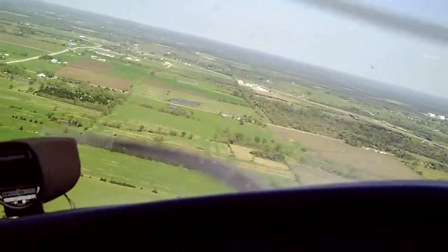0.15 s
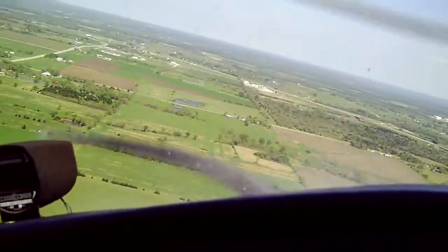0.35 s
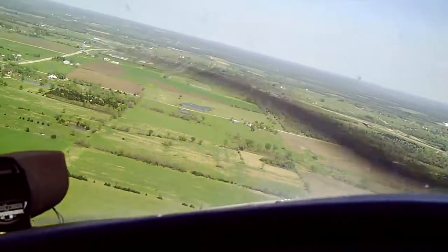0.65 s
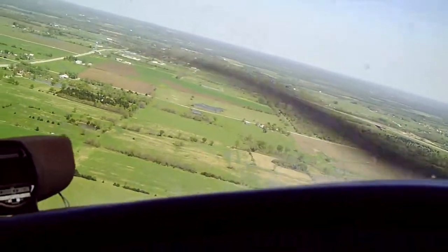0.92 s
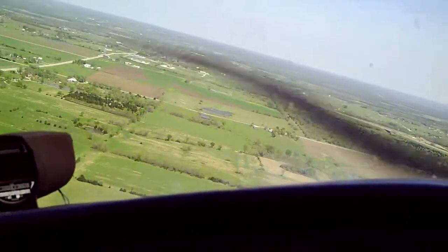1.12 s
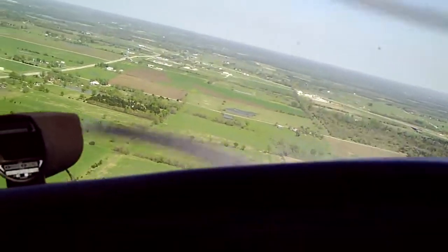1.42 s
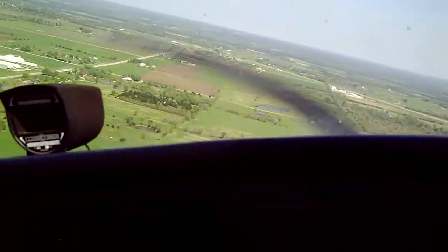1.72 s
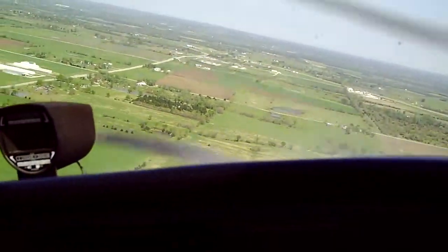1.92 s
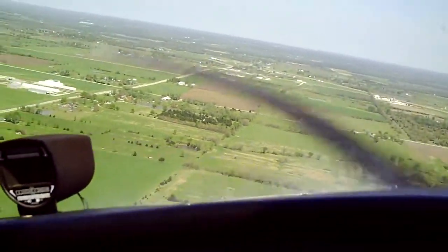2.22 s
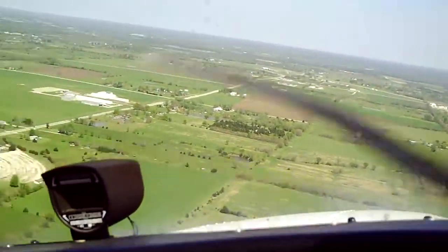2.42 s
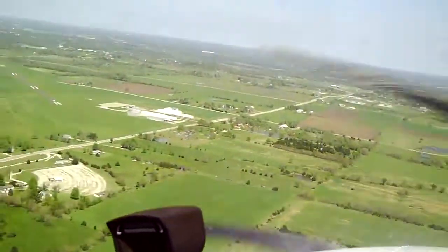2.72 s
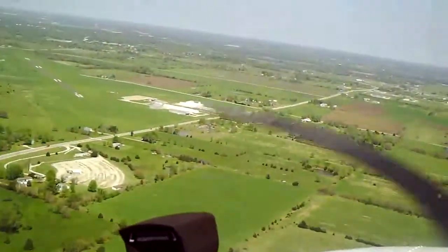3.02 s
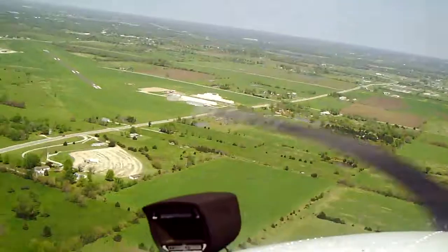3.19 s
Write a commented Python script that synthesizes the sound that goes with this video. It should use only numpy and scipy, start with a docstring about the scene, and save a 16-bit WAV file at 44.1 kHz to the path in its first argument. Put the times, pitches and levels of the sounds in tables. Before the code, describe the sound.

The loud, low drone of a light propeller aircraft in flight fills the cabin, mixed with rushing wind and deep buffeting. Its pitch sags a little toward the end, and the strongest swells slightly overload the microphone inside.

```python
"""Light propeller plane cabin, banking turn

Shaft, blade and firing tones drone and sag a little near the end, and the gears whine with them.
Exhaust pulses ring the cabin, its air throbs at a very low pitch and gusts buffet the airframe.
The slipstream roars, rushes at the seals and hisses at the vents. The loudest swings overload the mic."""
import sys
import numpy as np
from scipy import signal
from scipy.fft import rfft, irfft, next_fast_len
from scipy.io import wavfile
from scipy.ndimage import uniform_filter1d

SR = 44100
rng = np.random.default_rng(int(sys.argv[2]) if len(sys.argv) > 2 else 0)


def master_out(mix):
    """Clip the mix to full scale and print it as 16-bit PCM to the path in sys.argv[1]."""
    frames = np.transpose(np.atleast_2d(mix))
    ceiling = np.clip(frames, -1, 1)
    pcm = np.round(ceiling * 32767).astype(np.int16)
    wavfile.write(sys.argv[1], SR, pcm)


N = 147735


def undb(db):
    """Decibels to gain."""
    return 10 ** (np.asarray(db) / 20)


def unit(x):
    """Scale to rms 1."""
    return x / np.sqrt(np.mean(x ** 2))


def curve(rows):
    """Each column of a time table, joined by straight lines."""
    times, *columns = np.array(rows, float).T
    return np.squeeze([np.interp(np.arange(N) / SR, times, column) for column in columns])


def equalise(x, outline):
    """Filter by a (Hz, dB) outline."""
    hz, db = np.array(outline, float).T
    size = next_fast_len(N + SR // 10)
    bins_hz = np.maximum(np.fft.rfftfreq(size, 1 / SR), 1)
    gain = undb(np.interp(np.log(bins_hz), np.log(hz), db))
    return irfft(rfft(x, size) * gain, size)[..., :N]


def noise(spectrum):
    """Noise of rms 1 with a (Hz, dB) spectrum."""
    return unit(equalise(rng.standard_normal(N), spectrum))


def wander(rate_hz):
    """Smooth random motion of rms 1."""
    hold = max(int(SR / rate_hz), 2)
    steps = np.repeat(rng.standard_normal(N // hold + 2), hold)
    return unit(uniform_filter1d(uniform_filter1d(steps, hold), hold)[:N])


def tone(cycles):
    """Sine of rms 1 with a random starting phase."""
    return np.sqrt(2) * np.sin(2 * np.pi * (cycles + rng.random()))


# Each row: time in seconds, then level in dB of shaft multiples 1 to 5.
HARMONIC_LEVELS_DB = [(0, -14.5, -15, -21.5, -30, -25.5), (.3, -24, -21.5, -17.5, -30, -26),
                      (.65, -9, -16, -22.5, -25, -24.5), (1, -14, -15, -19.5, -24, -23.5),
                      (1.25, -15, -19, -26, -22.5, -31), (1.55, -19, -13.5, -19, -18.5, -42),
                      (1.95, -19, -15, -21, -23.5, -33), (2.2, -18, -17, -21.5, -21.5, -26.5),
                      (2.5, -10.5, -14.5, -19.5, -41, -28), (2.85, -18.5, -19, -18.5, -37, -27.5),
                      (3.1, -19, -15, -22.5, -31, -28.5), (3.35, -18, -16, -23.5, -29, -32)]
# Each row: shaft multiple, relative level in dB.
WEAK_TONES_DB = [(2.5, -29), (4.5, -32), (7, -36), (7.5, -36), (8, -34), (10, -42), (12, -38), (13, -39)]


def drone(turns, weak_gain_db=-2.5, waver_db=2, waver_hz=3.99):
    """Shaft-locked tones: five swell and fade, weaker ones waver. Multiple 2 is blades and firing."""
    strong = sum(undb(db) * tone(multiple * turns)
                 for multiple, db in enumerate(curve(HARMONIC_LEVELS_DB), start=1))
    weak = sum(undb(db + weak_gain_db + waver_db * wander(waver_hz)) * tone(multiple * turns)
               for multiple, db in WEAK_TONES_DB)
    return strong + weak


# Each row: frequency in Hz, cabin gain in dB.
EXHAUST_SPECTRUM = [(150, -12), (300, -3), (450, -2.5), (600, 1), (1000, -2.5), (1450, -1.5), (1900, -17.5),
                    (3000, -17), (4500, -56)]


def exhaust(turns, cylinders=4, level_db=-29, ring_s=.02, scatter_db=2.5, jitter_s=.00007):
    """The cylinders fire in turn over two revolutions; each rings the cabin in its own way."""
    firings = np.flatnonzero(np.diff(np.floor(2 * turns)))
    timing, strength = rng.standard_normal((len(firings), 2)).T
    starts = np.clip(firings + jitter_s * SR * timing, 0, N - 1).astype(int)
    gains = undb(scatter_db * strength)
    decay = np.exp(-np.arange(SR // 10) / SR / ring_s)
    clatter = np.zeros(N)
    for cylinder in range(cylinders):
        pulses = np.bincount(starts[cylinder::cylinders], gains[cylinder::cylinders], N)
        ring = decay * rng.standard_normal(len(decay))
        clatter += signal.fftconvolve(pulses, ring)[:N]
    return undb(level_db) * unit(equalise(clatter, EXHAUST_SPECTRUM))


# Each row: shaft multiple, width in Hz.
GEAR_TONES = [(48, 25), (62.6, 50), (72, 40)]
# Each row: time in seconds, then level in dB of each of the three gear tones.
GEAR_LEVELS_DB = [(0, -53, -50, -49), (.5, -60, -47, -56), (1.1, -51, -47, -52), (1.35, -52, -42.5, -50),
                  (1.68, -45, -42, -42.5), (1.95, -64, -48, -49), (2.45, -51, -53, -44.5),
                  (2.9, -51, -61, -51), (3.35, -53, -52, -45)]


def gear_whine(turns):
    """Narrow, rough gear tones that follow the shaft."""
    whine = np.zeros(N)
    for (multiple, width_hz), db in zip(GEAR_TONES, curve(GEAR_LEVELS_DB)):
        detune_hz = width_hz / 2 * wander(2 * width_hz)
        whine += undb(db) * tone(multiple * turns + np.cumsum(detune_hz) / SR)
    return whine


# Each row: time in seconds, level in dB.
THROB_LEVEL_DB = [(0, -28), (.18, -10.5), (.32, -20), (.55, -14), (.8, -16.5), (1, -20), (1.35, -16.5),
                  (1.48, -7.5), (1.68, -17.5), (1.88, -14), (2.25, -16.5), (2.48, -10.5), (2.65, -15),
                  (2.87, -10), (3.15, -11), (3.35, -19)]


def cabin_throb(centre_hz=23, drift_hz=3):
    """The cabin air pumps at an unsteady, very low pitch."""
    pitch_hz = centre_hz + drift_hz * wander(rate_hz=8)
    return undb(curve(THROB_LEVEL_DB)) * tone(np.cumsum(pitch_hz) / SR)


# Each row: frequency in Hz, relative density in dB.
BUFFET_SPECTRUM = [(3, -5), (12, -0.5), (22, 2.5), (32, 3.5), (42, -4.5), (55, 5), (70, -5), (90, -3.5),
                   (113, 0), (130, -7), (160, -20), (300, -48.5)]
# Each row: time in seconds, level in dB.
BUFFET_LEVEL_DB = [(0, -15), (.35, -16.5), (.65, -14.5), (.95, -16.5), (1.3, -20), (1.7, -16), (2, -14.5),
                   (2.3, -17.5), (2.6, -16), (3.35, -17.5)]


def buffet():
    """Gusts shake the airframe into a low rumble."""
    return noise(BUFFET_SPECTRUM) * undb(curve(BUFFET_LEVEL_DB))


# Each row: frequency in Hz, relative density in dB.
WALL_ROAR_SPECTRUM = [(60, -31), (120, -3), (155, -1.5), (210, -5.5), (250, -8.5), (350, -7), (400, -11.5),
                      (465, -18.5), (620, -13.5), (750, -16), (880, -14.5), (960, -19), (1040, -19),
                      (1100, -15.5), (1145, -20.5), (1190, -14.5), (1230, -18.5), (1360, -20.5),
                      (1430, -16.5), (1500, -17.5), (1550, -24), (1750, -26), (1900, -35), (2600, -48),
                      (5000, -65)]
SEAL_RUSH_SPECTRUM = [(1200, -7), (1750, -2.5), (2200, -2), (2500, -2), (2700, -3), (2820, 1.5), (2970, -1),
                      (3150, 0.5), (3500, -3), (3620, -6.5), (3800, -8), (4050, -14), (6000, -45)]
VENT_HISS_SPECTRUM = [(2500, -32), (3800, -5), (4400, -2), (5100, 1.5), (5700, -2), (6200, -0.5),
                      (6550, 2.5), (6900, 0), (7300, -0.5), (7900, 1.5), (8300, 1.5), (8650, 4), (9100, 0),
                      (9700, -1), (11000, -5.5), (14000, -9)]
# Each row: time in seconds, level in dB.
WALL_ROAR_DB = [(0, -19), (.9, -19.5), (1.7, -19.7), (2.4, -19.5), (2.9, -20.5), (3.35, -20)]
SEAL_RUSH_DB = [(0, -35), (1.1, -35), (1.35, -34.5), (1.75, -33), (2.05, -34), (2.6, -36), (3.35, -35.5)]
VENT_HISS_DB = [(0, -36), (1.2, -36.5), (1.7, -35), (2.3, -36.5), (2.9, -38), (3.35, -37)]


def slipstream(turns, blades=2, wash_depth=.04, roar_flutter_db=.47, treble_flutter_db=.5):
    """Turbulent air at the walls, door seals and vents, pulsing slightly with each blade's wash."""
    roar = noise(WALL_ROAR_SPECTRUM) * undb(curve(WALL_ROAR_DB) + roar_flutter_db * wander(rate_hz=14))
    rush = noise(SEAL_RUSH_SPECTRUM) * undb(curve(SEAL_RUSH_DB))
    hiss = noise(VENT_HISS_SPECTRUM) * undb(curve(VENT_HISS_DB))
    flutter = undb(treble_flutter_db * wander(rate_hz=30.34))
    wash = 1 + wash_depth * np.sin(2 * np.pi * blades * turns)
    return wash * (roar + (rush + hiss) * flutter)


# Each row: time in seconds, shaft speed in turns per second.
SHAFT_SPEED_HZ = [(0, 45.8), (.7, 45.95), (1.5, 45.75), (2.2, 45.9), (2.45, 45.4), (2.7, 44.3), (2.95, 43),
                  (3.15, 42.5), (3.35, 42.8)]


def scene():
    """Engine and air, heard from the seat in mono."""
    turns = np.cumsum(curve(SHAFT_SPEED_HZ)) / SR
    engine = drone(turns) + exhaust(turns) + gear_whine(turns)
    air = cabin_throb() + buffet() + slipstream(turns)
    return (engine + air)[None]


# Each row: frequency in Hz, gain in dB.
TREBLE_ROLL_OFF = [(9700, 0), (11000, -7.5), (12000, -9), (13000, -14), (13700, -32)]


def record(dry, drive_db=.5, ceiling=.98, knee=14, cutoff_hz=13600):
    """The mic flattens the largest swings, briefly choking the hiss; the treble rolls off and is cut."""
    driven = dry * undb(drive_db)
    clipped = driven / (1 + np.abs(driven / ceiling) ** knee) ** (1 / knee)
    dulled = equalise(clipped, TREBLE_ROLL_OFF)
    lowpass = signal.ellip(10, .05, 80, cutoff_hz, fs=SR, output="sos")
    return signal.sosfilt(lowpass, dulled)


dry = scene()
out = record(dry)
master_out(out)
```